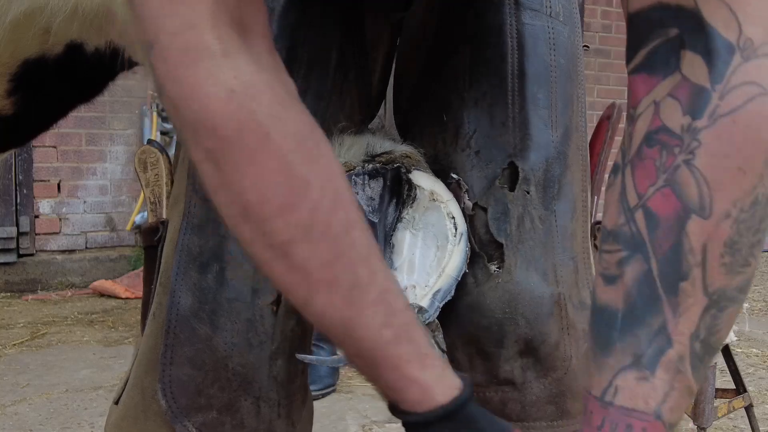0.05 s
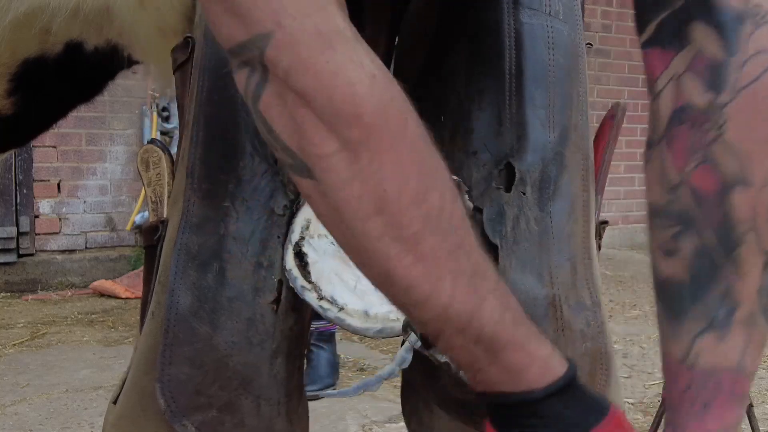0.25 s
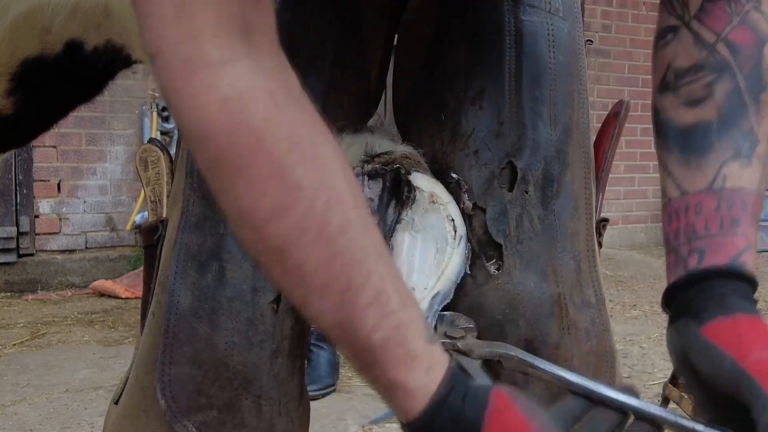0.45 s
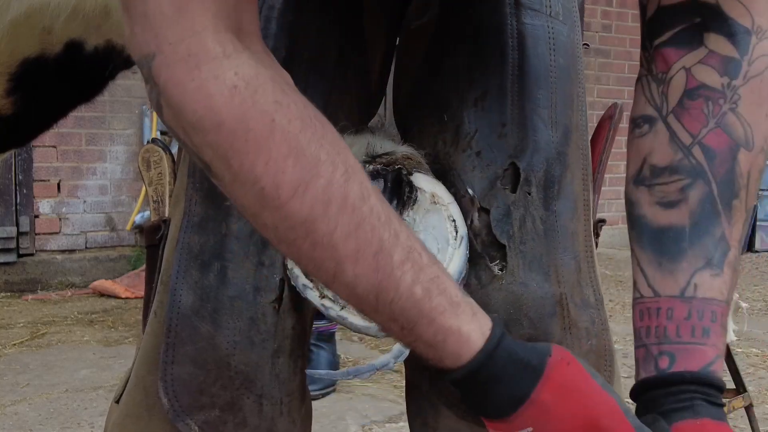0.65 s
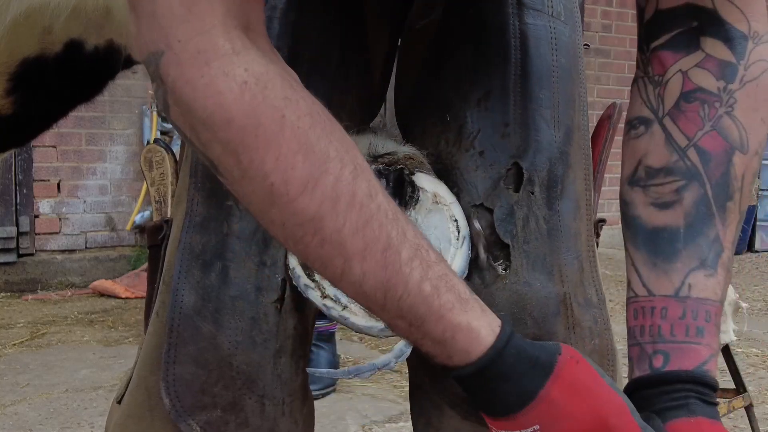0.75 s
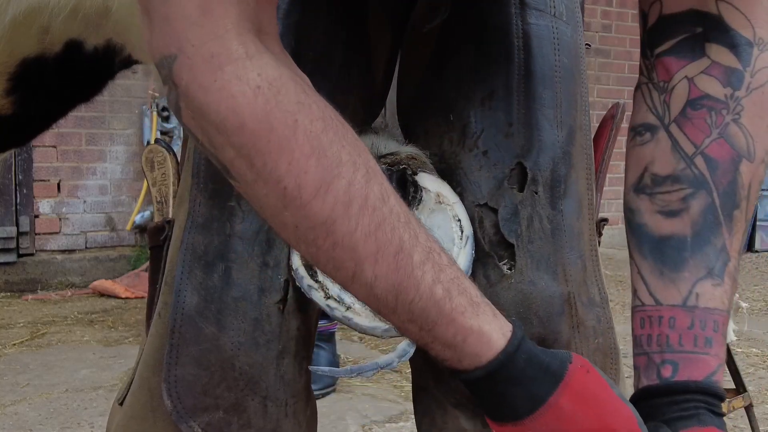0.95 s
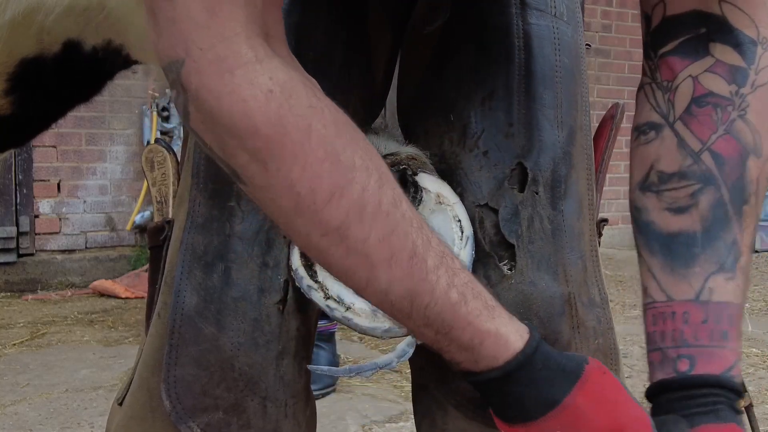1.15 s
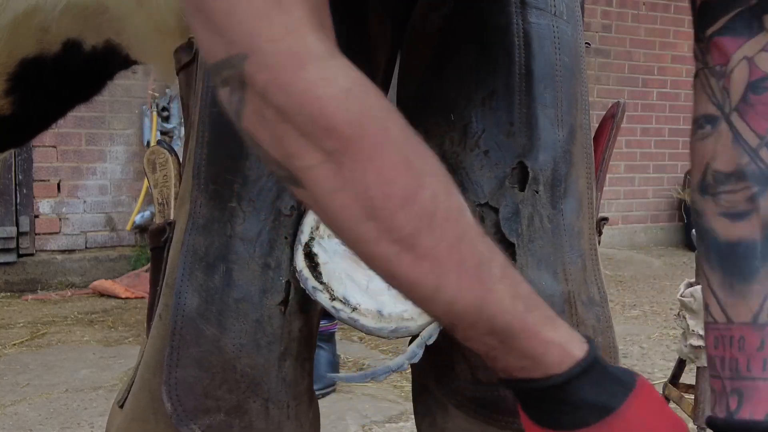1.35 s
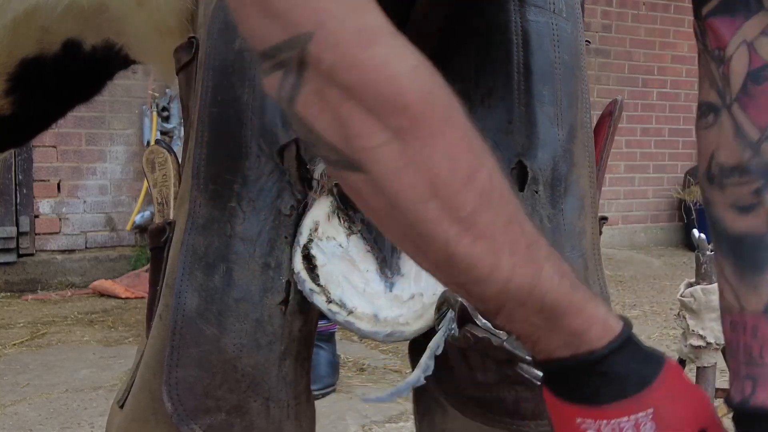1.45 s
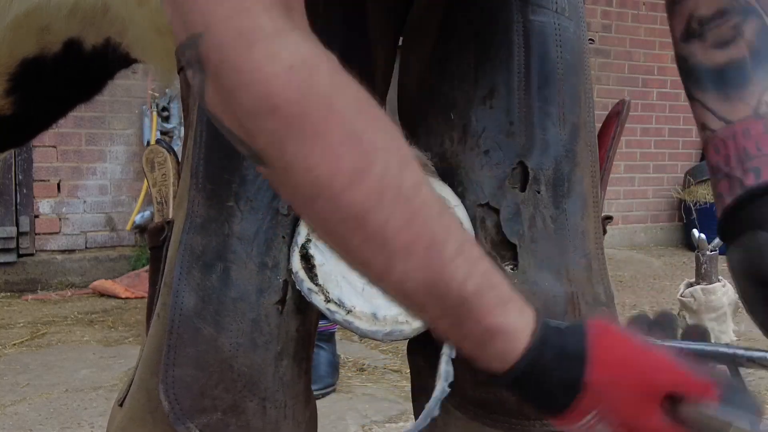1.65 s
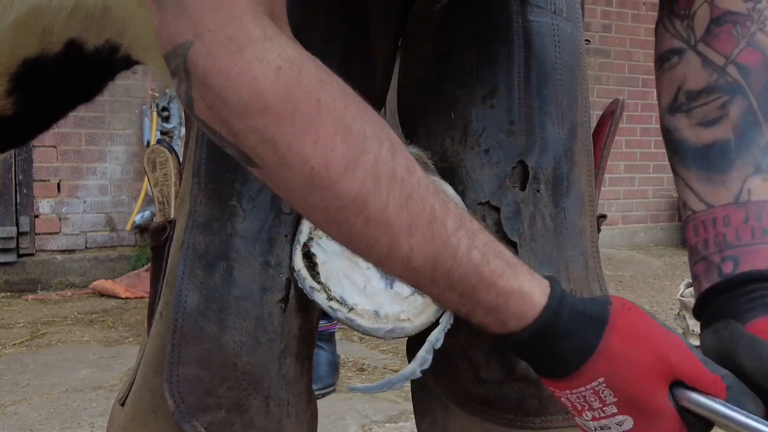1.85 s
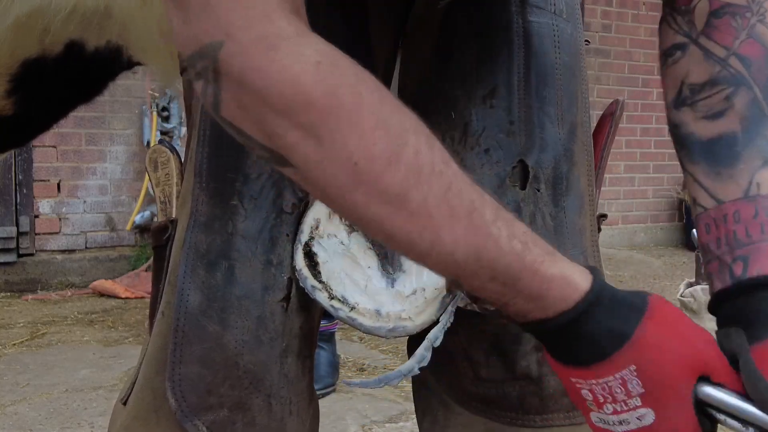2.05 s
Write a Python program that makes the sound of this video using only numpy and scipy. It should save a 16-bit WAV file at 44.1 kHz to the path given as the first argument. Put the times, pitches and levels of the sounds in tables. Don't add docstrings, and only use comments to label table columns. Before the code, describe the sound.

Steel hoof nippers snap twice through horse hoof, sharp cracks echoing off brick in a windy yard

```python
import sys
import numpy as np
from scipy import signal
from scipy.fft import rfft, irfft
from scipy.io import wavfile

SR = 44100
rng = np.random.default_rng(int(sys.argv[2]) if len(sys.argv) > 2 else 0)


def nominal_scale(level):
    x = np.asarray(level, float) / 20
    return 10 ** x


def inscribe(sig):
    pcm = np.round(np.clip(np.atleast_2d(sig).T, -1, 1) * 32767)
    wavfile.write(sys.argv[1], SR, pcm.astype(np.int16))


N = 92610

# t/s, crack level/dB, crack t60/s, wall echo level/dB, yard level/dB
SNAPS = [
    (0.2411, -8.5, 0.018, -13, -16),
    (1.4730, -8, 0.024, -8, -21),
]
# f/Hz, density/dB
CRACK_SPECTRA = [
    [(530, -56), (900, -34.5), (1250, 1.5), (2120, -5.5), (6330, -5), (8350, -11), (10400, -8),
     (16000, -14)],
    [(250, -13), (550, 1), (900, -16), (1300, -2), (2200, -6.5), (4000, -10), (6400, -4), (16000, -12.5)],
]
# time constant/s, level re crack/dB
TEARS = [
    (.0025, -24),
    (.007, -22),
]
# level/dB, f/Hz
FLICKS = [
    (-4.5, 4800),
    (-16, 3000),
]
# f/Hz, first snap level/dB, second snap level/dB, t60/s
JAW_MODES = [(1240, -34, -19, .022), (2190, -32, -16, .022), (3540, -33, -20, .028), (4235, -25, -32, .014),
             (4620, -24, -35, .014), (5235, -31, -19, .045), (6450, -22, -14, .036), (7640, -31, -22, .02),
             (9450, -31, -30, .015), (10330, -19, -28, .015), (10600, -15, -30, .017),
             (13200, -27, -29, .012)]
BODY_CUT_HZ = [1240, 300]
# f/Hz, density/dB
SENT_SPECTRA = [
    [(530, -56), (900, -29), (1260, -6.5), (1720, -5), (2190, -3.5), (5410, -2.5), (16000, -9)],
    [(530, -48), (900, -25.5), (1190, -0.5), (2450, -16.5), (6330, -4), (6890, -8), (16000, -13)],
]
WALL_DELAY_S = [.0238, .0230]
WALL_SPREAD_S = [.0025, .0014]
# f/Hz, t60/s
YARD_T60 = [(500, 0.7), (1500, 0.48), (3000, 0.52), (6000, 0.39), (10000, 0.31), (16000, 0.26)]
# t/s, level/dB, centre f/Hz, t60/s, tool ring level/dB
TICKS = [(.182, -55, 4600, 0.044, -29), (0.5207, -51.5, 8800, 0.033, -23),
         (0.5510, -47.5, 3600, 0.024, -28), (0.657, -68, 3600, .04, -33.5), (.948, -68, 5920, 0.012, -34),
         (.986, -63, 7160, 0.037, -36), (1.800, -60, 3370, 0.028, -29.5), (1.842, -43.5, 600, 0.029, -40),
         (1.682, -53.5, 1490, .035, -34), (1.866, -58, 1473, 0.024, -30), (.172, -59, 7860, 0.017, -31),
         (1.671, -48, 700, 0.04, -40)]
# f/Hz, level/dB, t60/s
LOOSE_MODES = [(1410, -2.5, 0.033), (1956, -0.5, 0.016), (2560, -3, .025), (2850, -4.5, 0.016),
               (3188, 1.5, .025), (4250, -4.5, .025), (4610, 0, 0.031), (5800, -2, .025), (6190, -1, 0.058),
               (7760, -2.5, .03), (9570, -5, .015), (13300, 1, .012)]
# peak t/s, rise/s, level/dB, centre f/Hz, tool ring level/dB
SCUFFS = [(0.017, 0.041, -69, 8300, -31), (0.072, 0.013, -66, 4400, -34), (.20, 0.045, -72, 7300, -35),
          (0.521, 0.0096, -55, 2600, -21), (0.506, 0.0015, -58.5, 2900, -28.5),
          (0.561, 0.038, -66, 4800, -33), (0.903, 0.05, -76, 14000, -40), (1.234, 0.006, -58, 4000, -32.5),
          (1.4, 0.019, -72, 4000, -36), (1.75, 0.0077, -62, 880, -36), (2.068, 0.0074, -70, 3300, -29),
          (1.86, 0.0042, -75, 2700, -30), (1.6, 0.03, -66, 1500, -36), (0.088, 0.14, -64, 1500, -40),
          (0.67, 0.0052, -71.5, 1500, -29), (1.11, .03, -66.5, 620, -41.5)]
# centre t/s, width/s, level/dB, f/Hz
SQUEAKS = [(0.52, 0.0044, -55, 1140), (.557, .005, -60, 2000), (0.59, .003, -69, 5900),
           (.578, .006, -73, 6100), (0.64, 0.0093, -69, 2040), (1.757, 0.0057, -69.5, 6300),
           (1.778, 0.0058, -71, 6000), (1.845, 0.011, -77.5, 5800), (0.02, 0.0036, -64, 4300),
           (.243, .006, -46, 580), (1.475, 0.0049, -33.5, 540), (1.375, 0.009, -72, 4420),
           (.99, 0.0036, -67, 2300)]
# t/s, level/dB
RUMBLE_LEVEL = [(0.0, -47.5), (0.13, -39.5), (0.16, -46), (0.23, -36), (0.36, -31), (0.4, -38),
                (0.509, -31), (0.57, -42.5), (0.64, -30.5), (1.04, -34.5), (1.12, -33.5), (1.2, -39),
                (1.41, -34.5), (1.44, -43.5), (1.59, -34), (1.62, -48), (1.65, -30), (2.1, -48.5)]
# f/Hz, density/dB
RUMBLE_SPECTRUM = [(8.8, -32.5), (15, 5), (43, -4), (68, -0.5), (210, -20.5), (346, -42.5), (395, -37.5),
                   (500, -56), (650, -80.5), (1100, -120)]
# centre t/s, width/s, level/dB, top f/Hz
BUFFETS = [(0.213, 0.0053, -38, 307), (0.246, 0.012, -36, 560), (.30, 0.037, -29, 256),
           (0.341, 0.0086, -40, 149), (0.658, 0.031, -44, 150), (0.754, 0.0091, -33, 524),
           (.785, 0.01135, -24, 422), (0.824, 0.017, -29, 288), (0.957, 0.011, -31.5, 239.7),
           (0.999, 0.026, -42, 250), (1.093, 0.025, -28, 309), (1.211, 0.011, -30, 350),
           (1.292, 0.017, -30.5, 300), (1.336, 0.011, -25.5, 556), (1.384, 0.018, -32, 308),
           (1.47, 0.011, -23.5, 343), (1.521, 0.003, -26.5, 297), (1.557, 0.015, -26, 409.7),
           (1.586, 0.0042, -17.5, 340), (1.644, 0.027, -30.5, 314), (1.70, 0.063, -32.5, 254.4),
           (1.808, 0.0042, -31.5, 350), (1.88, .03, -40.5, 233.7), (1.97, 0.06, -41.5, 254.4)]
# f/Hz, level/dB
WIND_SIDE = [(30, -23.5), (110, -20), (200, -16), (380, -4.5), (700, -1), (2000, 1.5)]
# f/Hz, density/dB
AIR_SPECTRUM = [(180, -24), (300, -5), (470, -8.5), (1640, -20.5), (2070, -28), (9390, -46.5), (12500, -49),
                (13300, -61), (16000, -67)]
# from t/s, to t/s, low f/Hz, high f/Hz
MONO = [
    (1.06, 3, 0, 1200),
    (.85, 3, 1200, 3100),
    (1.3, 1.365, 0, 22050),
    (1.44, 1.508, 0, 22050),
    (1.5, 1.555, 13200, 22050),
]


def curve(points, at_hz):
    hz, value = np.transpose(points)
    return np.interp(np.log(np.maximum(at_hz, 1)), np.log(hz), value)


def unit(x):
    return x / np.sqrt(np.mean(x ** 2) + 1e-20)


def energy(x):
    return np.sum(x ** 2)


def gain_curve(spectrum, size):
    return nominal_scale(curve(spectrum, np.fft.rfftfreq(size, 1 / SR)))


def coloured(spectrum, size):
    white = rng.standard_normal((2, size))
    return unit(irfft(rfft(white) * gain_curve(spectrum, size), size))


def hump(hz):
    return [(hz / 16, -45), (hz / 2, -4.0), (hz, 0), (hz * 2, -7.0), (hz * 8, -42)]


def stereo(mid, side):
    return np.array([mid + side, mid - side])


def drift(rate_hz):
    pole = np.exp(-2 * np.pi * rate_hz / SR)
    white = rng.standard_normal(N + SR)
    return unit(signal.lfilter([1], [1, -2 * pole, pole * pole], white)[SR:])


def swell(centre_s, width_s, fall=1):
    t = np.arange(N) / SR - centre_s
    return np.exp(-.5 * (t / np.where(t > 0, fall * width_s, width_s)) ** 2)


def ring(x, hz, t60_s):
    r, w = nominal_scale(-60 / (t60_s * SR)), 2 * np.pi * hz / SR
    return signal.lfilter([0, np.sin(w)], [1, -2 * r * np.cos(w), r * r], x + 1e-18)


def add(out, x, s):
    i = max(int(round(s * SR)), 0)
    out[..., i:i + x.shape[-1]] += x[..., :N - i]


def snaps():
    out, t, tail = np.zeros((2, N)), np.arange(SR // 4) / SR, yard()
    lead_s = .04
    for k, (s, db, t60_s, echo_db, yard_db) in enumerate(SNAPS):
        after = t - lead_s
        mid, side = crack(k, after, db, t60_s)
        steel = jaws(k, after)
        body = signal.butter(8, BODY_CUT_HZ[k], "high", fs=SR, output="sos")
        direct = signal.sosfilt(body, mid + steel)
        blow = np.roll(irfft(gain_curve(SENT_SPECTRA[k], len(t)), len(t)), int(lead_s * SR))
        blow = blow * np.sqrt(energy(mid) / energy(blow))
        sent = signal.sosfilt(body, (blow + 1.6 * steel)[None])
        echo = signal.fftconvolve(wall(k), sent - steel, axes=1)
        decay = signal.fftconvolve(tail, sent, axes=1)
        add(out, stereo(direct, ports(direct) + 0.097 * side), s - lead_s)
        add(out, nominal_scale(echo_db) * echo, s - lead_s)
        add(out, nominal_scale(yard_db) * decay, s - lead_s)
    return out


def crack(k, after, db, t60_s):
    tear_s, tear_db = TEARS[k]
    flick_db, flick_hz = FLICKS[k]
    tear = nominal_scale(tear_db) * np.exp(np.minimum(after, 0) / tear_s)
    shape = np.where(after < 0, tear, nominal_scale(-60 * after / t60_s))
    out = nominal_scale(db) * shape * coloured(CRACK_SPECTRA[k], len(after))
    cycles = flick_hz * after
    out[0] -= nominal_scale(flick_db) * np.sin(2 * np.pi * cycles) * np.exp(-(cycles - 1.3) ** 2)
    return out


def jaws(k, after):
    strike_s = 0.0021
    burst = (after >= 0) * np.exp(-np.abs(after) / strike_s)
    strikes = rng.standard_normal((len(JAW_MODES), len(after))) * burst
    return sum(nominal_scale(row[1 + k]) * ring(hit / np.sqrt(energy(hit)), row[0], row[3])
               for row, hit in zip(JAW_MODES, strikes))


def ports(x):
    pan, lag, treble = .12, .45, .4
    slope = np.gradient(x)
    return pan * x - lag * slope + treble * np.convolve(slope, [1, -2, 1], "same")


def wall(k):
    t = np.arange(SR // 20) / SR
    spread = np.exp(-.5 * ((t - WALL_DELAY_S[k]) / WALL_SPREAD_S[k]) ** 2)
    mid, side = rng.standard_normal((2, len(t))) * spread
    return stereo(mid, .3 * side + ports(mid)) / np.sqrt(energy(mid))


def yard():
    start_s, side_gain = .028, .95
    t, out = np.arange(SR // 2) / SR, 0
    edges_hz = np.geomspace(400, 19000, num=13)
    for low, high in zip(edges_hz, edges_hz[1:]):
        band_pass = signal.butter(2, [low, high], "band", fs=SR, output="sos")
        band = signal.sosfilt(band_pass, rng.standard_normal((2, len(t))))
        out = out + band * nominal_scale(-60 * t / curve(YARD_T60, np.sqrt(low * high)))
    onset = 1 - np.exp(-(t / start_s) ** 5)
    out = stereo(out[0], side_gain * out[1]) * onset
    return out / np.sqrt(energy(out) / 2)


def ticks():
    out, t = np.zeros((2, N)), np.arange(SR // 8) / SR
    rise_cycles = 1.0
    for s, db, hz, t60_s, ring_db in TICKS:
        spectrum = hump(hz)[:4] + [(hz * 4, -30), (hz * 16, -70)]
        tap = coloured(spectrum, len(t)) * nominal_scale(db - 60 * t / t60_s)
        mid, side = tap * (1 - np.exp(-(t * hz / rise_cycles) ** 2))
        add(out, stereo(mid + nominal_scale(ring_db) * loose(mid), 0.59 * side), s)
    return out


def loose(x):
    return sum(nominal_scale(db) * ring(x, hz, t60_s) for hz, db, t60_s in LOOSE_MODES)


def scuffs():
    out = 0
    for s, rise_s, db, hz, ring_db in SCUFFS:
        grain_db = 1.4 * drift(300)
        mid, side = coloured(hump(hz), N) * nominal_scale(db + grain_db) * swell(s, rise_s, fall=.6)
        out = out + stereo(mid + nominal_scale(ring_db) * loose(mid), 0.84 * side)
    return out


def squeaks():
    out, t60_s = 0, .02
    for s, width_s, db, hz in SQUEAKS:
        mid, side = [unit(ring(v, hz, t60_s)) for v in rng.standard_normal((2, N))]
        out = out + nominal_scale(db) * swell(s, width_s) * stereo(mid, .4 * side)
    return out


def wind():
    s, db = np.transpose(RUMBLE_LEVEL)
    level_db = np.interp(np.arange(N) / SR, s, db) - 0.5
    rumble = coloured(RUMBLE_SPECTRUM + [(2000, -110)], N) * nominal_scale(level_db)
    mid, side = rumble + buffets()
    return stereo(mid, irfft(rfft(side) * gain_curve(WIND_SIDE, N), N))


def buffets():
    out, low_hz = 0, 75.6
    for s, width_s, db, hz in BUFFETS:
        spectrum = [(low_hz / 4, -18), (low_hz, 0), (hz / 2, -3.0), (hz, -13), (hz * 2, -36), (hz * 8, -80)]
        puff = coloured(spectrum, N) * swell(s, width_s)
        rms = np.sqrt(energy(puff[0]) / (np.sqrt(np.pi) * width_s * SR))
        out = out + nominal_scale(db) * puff / rms
    return out


def air():
    level_db, patchy_db, side_db = -57.5, 1.0, -4
    hush = coloured([(100, -18)] + AIR_SPECTRUM, N)
    mid, side = hush * nominal_scale(level_db + patchy_db * drift(7.6))
    return stereo(mid, nominal_scale(side_db) * side)


def scene():
    return snaps() + ticks() + scuffs() + squeaks() + wind() + air()


def band_limit(x):
    return signal.sosfilt(signal.butter(12, 16830, fs=SR, output="sos"), x)


def record(dry):
    cutoff_hz, late_s, late_side_db = 16050, 1.06, -5
    top_cut = signal.cheby2(10, 30, cutoff_hz, fs=SR, output="sos")
    x = signal.sosfilt(top_cut, np.tanh(dry))
    hz, t, side = signal.stft((x[0] - x[1]) / 2, SR, nperseg=512)
    side = side * np.where(t > late_s, nominal_scale(late_side_db), 1)
    for start, end, low, high in MONO:
        side[np.ix_((hz >= low) & (hz <= high), (t >= start) & (t <= end))] = 0
    side = signal.istft(side, SR, nperseg=512)[1][:N]
    return band_limit(stereo(x.mean(axis=0), side))


dry = scene()
out = record(dry)
inscribe(out)
```